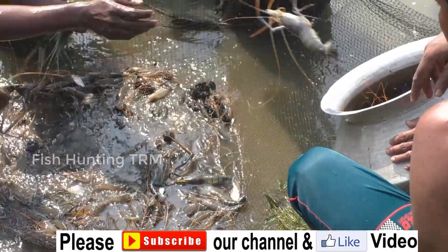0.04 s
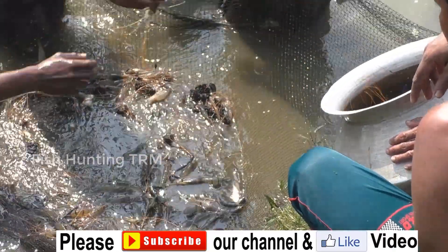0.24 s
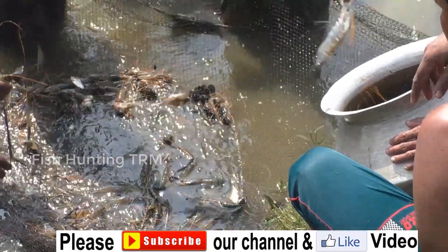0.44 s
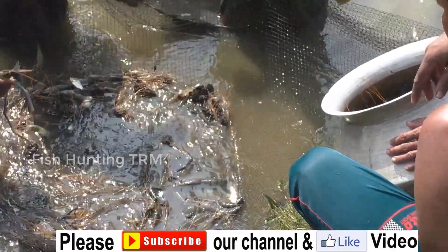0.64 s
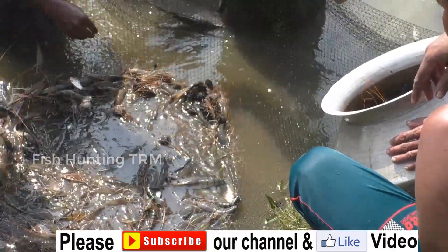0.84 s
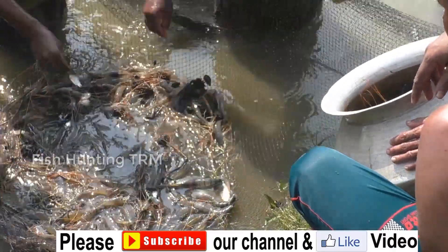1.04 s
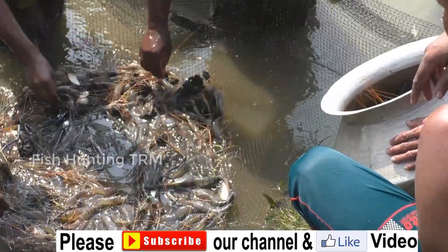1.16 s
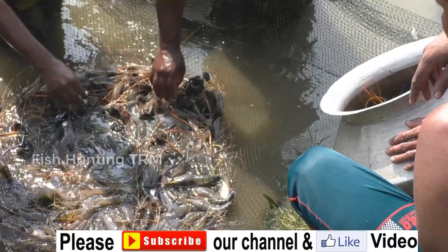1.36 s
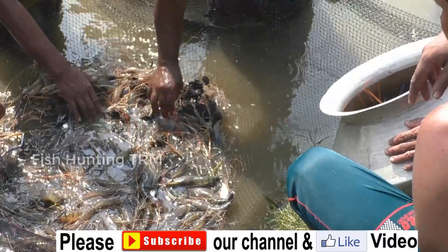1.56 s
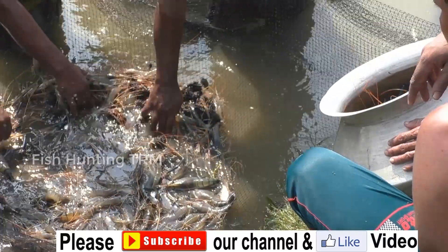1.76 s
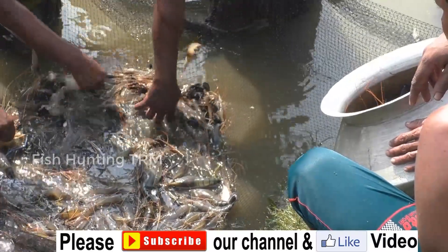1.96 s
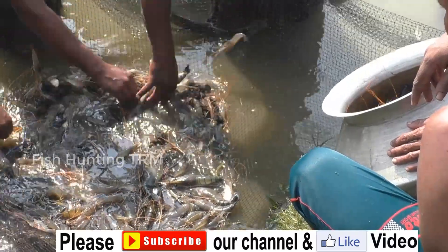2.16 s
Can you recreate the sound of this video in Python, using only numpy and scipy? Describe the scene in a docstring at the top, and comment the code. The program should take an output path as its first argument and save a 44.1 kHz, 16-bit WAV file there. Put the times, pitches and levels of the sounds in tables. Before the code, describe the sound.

Prawns and small fish flap and splash in a wet net, heard close in stereo outdoors; a plop, then sharp smacks and a ringing metal pot knock, then sparser flicks over a faint far throb.

```python
"""Prawns and small fish in a wet net in shallow water, heard close by in stereo as hands sort them.
From the start the catch crackles wetly, over open air and a far, pump-like throb ten times a second.
Flaps burst in bubbles and spray, right of centre at first; soft blows boom in a metal pot and large bubbles plop.
From half a second tails smack, shells snap and the pot wall is knocked, ringing on the right.
The action drifts to the centre while a faint far hum passes at 1.4 s; short dull echoes follow all near sounds."""
import sys
import numpy as np
from scipy import signal
from scipy.fft import rfft, irfft
from scipy.io import wavfile

SR = 44100
rng = np.random.default_rng(int(sys.argv[2]) if len(sys.argv) > 2 else 0)


def store_pcm(level_fs):
    """Save levels as 16-bit WAV."""
    pcm = np.round(np.clip(level_fs, -1, 1) * 32767).astype(np.int16)
    wavfile.write(sys.argv[1], SR, np.atleast_2d(pcm).T)


N = 97020  # 2.2 s

# Place of the action on the water, drifting from right to centre: t/s, left-right level/dB
WATER_PAN = [(.7, -2), (2.0, 0.0423)]
POT_PAN_DB = -2  # left-right level, so a little to the right
DROP_SPREAD_DB = 3.5  # unevenness of the clicks behind bubbles and spray
EDGE_HZ = 16100  # upper limit of the recorder and of the droplet pitches


def amp(db):
    """Decibels to an amplitude factor."""
    return 10 ** (np.asarray(db) / 20)


def evened(x):
    """Scales to rms 1."""
    return x / np.sqrt(np.mean(x ** 2) + 1e-20)


def add(mix, s, sound):
    """Mixes a stereo sound in at time s."""
    part = mix[:, max(0, round(s * SR)):][:, :sound.shape[1]]
    part += sound[:, :part.shape[1]]


def placed(x, pan_db):
    """Mono to stereo by a left-right level difference."""
    return x * amp([[pan_db / 2], [-pan_db / 2]])


def water_pan(s):
    """Left-right level (dB) of the action at time s."""
    return np.interp(s, *np.transpose(WATER_PAN))


def band(x, edges_hz):
    """Causal Butterworth band-pass."""
    sos = signal.butter(N=3, Wn=edges_hz, btype="band", fs=SR, output="sos")
    return signal.sosfilt(sos, x)


def coloured(x, points):
    """Filters x by a response drawn through (Hz, dB) points on a log frequency axis."""
    hz, db = np.transpose(points)
    f = np.fft.rfftfreq(x.shape[-1], 1 / SR)
    gain = amp(np.interp(np.log(f + 1), np.log(hz), db))
    return irfft(rfft(x) * gain, x.shape[-1])


def drops(size, per_s, spread_db):
    """Random clicks of uneven strength and either sign."""
    strength = amp(spread_db * np.minimum(rng.exponential(1, size), 4))
    falls = rng.random(size) < per_s / SR
    return strength * rng.choice([-1, 1], size) * falls


def droplets(size, per_s, spread_db, count=32):
    """Tiny bursting droplets: very short pings at pitches spread evenly over the whole band."""
    width_hz = 609.5  # wide resonance, so each ping dies at once
    radius = np.exp(-np.pi * width_hz / SR)
    out = np.zeros(size)
    for hz in (np.arange(count) + rng.random(count)) * EDGE_HZ / count:
        pole = radius * np.exp(2j * np.pi * hz / SR)
        out += signal.lfilter([1], [1, -pole], drops(size, per_s / count, spread_db)).real
    return out


def ring(modes, t):
    """Sum of dying sines, one for each (Hz, dB, t60 s) mode."""
    return sum(amp(db - 60 * t / t60) * np.sin(2 * np.pi * hz * t) for hz, db, t60 in modes)


def stir():
    """Legs, shells and drips crackle all over the net: dense droplets under a moving level."""
    # Stirring of the wet catch: t/s, level/dB
    stir_level = [(0, -57), (.17, -62.5), (.27, -55), (.47, -56), (.55, -63), (.77, -70), (0.829, -56),
                  (.93, -59), (1.13, -65), (1.17, -55), (1.32, -63.5), (1.56, -65), (1.92, -58.5),
                  (2.03, -52.5), (2.2, -57.5)]
    # Tone of the crackle: f/Hz, level/dB
    stir_tone = [(550, -15.5), (1200, 0.5), (2600, 0), (4500, -9), (10000, -10.5), (16000, -16)]
    per_s, spread_db, width = 12000, 3.5, 0.14785
    centre, wide = (evened(coloured(droplets(N, per_s, spread_db), stir_tone)) for _ in range(2))
    level = amp(np.interp(np.arange(N) / SR, *np.transpose(stir_level)))
    return level * (centre + width * np.array([wide, -wide]))


def distance():
    """Open air as coloured noise, a far throb of regularly pulsed low rumble and a faint passing hum."""
    # Tone of the open air: f/Hz, level/dB
    air_tone = [(20, -26), (80, -1.5), (115, -7), (190, 0), (520, -15.5), (750, -13.5), (1500, -20.5),
                (16000, -46)]
    air_db, air_width = -62, 0.761
    first_s, every_s, length_s = 0.07504, 0.1003, 0.019714  # throb timing
    throb_hz, throb_db = (68.101, 103.65), -61
    hum_hz, hum_db, hum_s, hum_length_s = 704.8, -70, 1.4009, 0.21
    t = np.arange(N) / SR

    mid, side = (evened(coloured(rng.standard_normal(N), air_tone)) for _ in range(2))
    air = amp(air_db) * (mid + air_width * np.array([side, -side]))

    off_beat = (t - first_s + every_s / 2) % every_s - every_s / 2  # seconds from the nearest beat
    # only the phase of the noise is kept, so the rumble wanders in pitch but not in level
    rumble = np.cos(np.angle(signal.hilbert(band(rng.standard_normal(N), throb_hz))))
    throb = amp(throb_db) * evened(rumble) * np.exp(-(off_beat / length_s) ** 2 / 2)

    swell = np.exp(-((t - hum_s) / hum_length_s) ** 2)
    hum = amp(hum_db) * swell * np.sin(2 * np.pi * hum_hz * t)
    return air + throb + hum


def bubbling(t, range_hz, count=20):
    """A swarm of small bubbles, dying sines of rising pitch, within a noise wash of the same range."""
    per_s, cycles, rise = 900, 13.051, 0.012145  # cycles to fall to 1/e; upward glide
    swarm_share = 0.68194  # of the power
    low, high = range_hz
    swarm, u = np.zeros(len(t)), t[:1024]
    for hz in low * (high / low) ** ((np.arange(count) + rng.random(count)) / count):
        age = u * hz / cycles
        bubble = np.exp(-age) * np.sin(2 * np.pi * hz * u * (1 + rise * age))
        births = drops(2 * len(t), per_s / count, DROP_SPREAD_DB)
        swarm += signal.fftconvolve(births, bubble)[len(t):2 * len(t)]  # already under way at t = 0
    wash = evened(band(rng.standard_normal(len(t)), range_hz))
    return np.sqrt(swarm_share) * evened(band(swarm, range_hz)) + np.sqrt(1 - swarm_share) * wash


def flap(s, rise, fall, gurgle_db, splash_db, spray_db):
    """One flap: a dull push of water, low and high bubbles and spray swell together; spray dies fastest."""
    # Tone of the spray before each flap's own variation: f/Hz, level/dB
    spray_tone = [(1500, -29), (3000, -7.5), (3900, 0.5), (5000, -4), (6800, -0.5), (8000, -5.5),
                  (10000, -1.5), (16000, -13.5)]
    gurgle_hz, splash_hz = (1148.5, 2106), (2046.7, 3704.1)  # bubble pitch ranges
    slap_db, slap_hz = -18, (298.9, 992)  # level relative to the gurgle
    drops_per_s, colour_db, spray_fall_share = 16000, 2.0057, 0.86396
    t = np.arange(SR // 4) / SR

    def burst(x, db, fall):
        """Straight rise, then a fall of 20 dB in the given time."""
        shape = np.minimum(t / rise, 1) * amp(-20 * np.maximum(t - rise, 0) / fall)
        return amp(db) * evened(x * shape) * np.sqrt(np.mean(shape ** 2))

    water = burst(bubbling(t, gurgle_hz), gurgle_db, fall)
    water += burst(bubbling(t, splash_hz), splash_db, fall)
    water += burst(band(rng.standard_normal(len(t)), slap_hz), gurgle_db + slap_db, fall)
    colour = [(hz, db + colour_db * rng.standard_normal()) for hz, db in spray_tone]
    mist = coloured(droplets(len(t), drops_per_s, DROP_SPREAD_DB), colour)
    spray = burst(mist, spray_db, fall * spray_fall_share)
    return placed(water, water_pan(s)) + spray  # spray stays central


def pot(splashes):
    """Soft blows boom the air in the pot; knocks ring its wall, which also answers the splashes."""
    # Soft blows: t/s, level/dB
    thumps = [(0.0, -41), (.05, -49), (.31, -49.5), (.365, -35), (.562, -43), (.63, -44), (.641, -45),
              (.682, -45.5), (.906, -44), (1.012, -50), (1.012, -51.5), (1.26, -41.5)]
    # Resonances of the air in the pot: f/Hz, level/dB, t60/s
    hollow = [(204.16, -0.5, 0.1558), (271.16, -2, 0.07042), (334.88, -6, 0.03866)]
    # Resonances of the metal wall: f/Hz, level/dB, t60/s
    wall_modes = [(1096, -6, 0.18428), (1341.5, -3.5, 0.0827), (2059.3, 0, 0.08058), (3171.2, -9, 0.05873)]
    # Knocks on the wall, one hard and one glancing: t/s, level/dB
    knocks = [(.7225, -22), (1.055, -46)]
    thump_rise_s, knock_rise_s, sympathy_db = 0.0020745, 0.003074, -9
    out, t = np.zeros((2, N)), np.arange(SR // 2) / SR

    boom = np.minimum(t / thump_rise_s, 1) * ring(hollow, t)
    for s, db in thumps:
        add(out, s, placed(amp(db) * boom, 0))
    wall = ring(wall_modes, t) * (1 - np.exp(-(t / knock_rise_s) ** 2))
    for s, db in knocks:
        add(out, s, placed(amp(db) * wall, POT_PAN_DB))
    response = wall / abs(rfft(wall)).max()  # gain 1 at the strongest resonance
    return out + amp(sympathy_db) * signal.fftconvolve(splashes, response[None], axes=1)[:, :N]


def echoes(x):
    """Short dull reflections from water, bank and bodies: decaying noise, different at each ear."""
    level_db, t60_s, delay_s = -12, 0.07412, 0.002
    t = np.arange(SR // 4) / SR
    tail = rng.standard_normal((2, len(t))) * np.exp(-np.log(1000) * t / t60_s) * (t > delay_s)
    tone = [(250, 4.5), (1000, -1.5), (3000, 0.5), (14000, -14.5)]  # f/Hz, level/dB
    tail = coloured(tail / np.linalg.norm(tail[0]), tone)
    return amp(level_db) * signal.fftconvolve(x, tail, axes=1)[:, :N]


def plops():
    """Large bubbles, as under a tossed prawn, ring briefly and rise a little in pitch."""
    # Large single bubbles: t/s, f/Hz at the start, level/dB ahead of the soft onset, t60/s
    large_bubbles = [(0.2074, 1155, -10, 0.034985), (0.2102, 1362, -21.5, 0.09078),
                     (.295, 1900, -28, 0.08498), (.299, 1286, -29, 0.04606), (.396, 1662, -33, 0.073),
                     (.567, 3488, -27.5, 0.0512), (.584, 1456, -28.5, 0.06058), (1.261, 3017, -33, 0.05394),
                     (1.262, 3298, -33.5, 0.04297), (2.086, 2457, -41.5, 0.0353)]
    rise_s, glide = 0.0006587, 0.01829
    out, t = np.zeros((2, N)), np.arange(SR // 4) / SR
    for s, hz, db, t60 in large_bubbles:
        tone = np.sin(2 * np.pi * hz * t * (1 + glide * t / t60))
        shape = np.exp(-np.log(1000) * t / t60) * (1 - np.exp(-t / rise_s))
        add(out, s, placed(amp(db) * shape * tone, POT_PAN_DB))
    return out


def smacks():
    """A tail hits the water and traps a pocket of air that rings for a few cycles; hard shells snap."""
    # Tail smacks on the water: t/s, f/Hz, envelope peak level/dB
    tail_hits = [(0.5626, 1770, -19), (0.5626, 2650, -18.5), (1.6463, 2848, -30.5), (1.9873, 2238, -27)]
    # Shell snaps: t/s, envelope peak level/dB
    shell_snaps = [(0.7243, -16.5), (1.994, -18)]
    smack_peak_s, snap_hz, snap_peak_s = 0.0012111, 4894, 0.00006  # time from onset to peak
    out, t = np.zeros((2, N)), np.arange(SR // 20) / SR

    def pulse(s, hz, db, peak_s):
        """A sine under a quick swell and decay."""
        shape = t / peak_s * np.exp(1 - t / peak_s)
        add(out, s, placed(amp(db) * shape * np.sin(2 * np.pi * hz * t), water_pan(s)))

    for s, hz, db in tail_hits:
        pulse(s, hz, db, smack_peak_s)
    for s, db in shell_snaps:
        pulse(s, snap_hz, db, snap_peak_s)
    return out


def scene():
    """The near sounds with their echoes, over the distance."""
    # Flaps and splashes: t/s, rise/s, time to fall 20 dB/s, gurgle level/dB, splash level/dB, spray level/dB
    flaps = [(0.0,0.00309,0.1634,-56.5,-49,-49), (.038,0.02291,0.0468,-45.5,-46,-52),
             (.119,0.00186,0.1632,-66,-60.5,-52), (.2075,0.001141,0.0213,-25.5,-34.5,-35.5),
             (.227,0.001384,0.0598,-37,-39,-46.5), (0.2934,0.004514,0.032,-36,-36.5,-45),
             (.312,0.01443,0.074,-45.5,-47,-45.5), (.361,0.01056,0.0295,-45,-37,-41),
             (.389,0.00726,0.0596,-41,-45.5,-48.5), (.436,.004,.016,-55,-43,-40),
             (.562,0.0019016,0.0229,-27,-25.5,-24), (.573,0.00319,.034,-34,-32.5,-44),
             (.628,0.005466,0.0988,-41.5,-40.5,-42.5), (.668,0.015538,0.0704,-41.5,-38.5,-39.5),
             (.7228,0.000948,0.0098,-32.5,-25,-26.5), (.858,0.004465,.07,-49,-46,-47),
             (.906,0.002864,0.0165,-56,-47.5,-53), (.959,.009,0.009,-54,-48,-41),
             (1.008,0.028096,0.0823,-55.5,-46.5,-48.5), (1.205,0.025054,0.0661,-56,-51,-47.5),
             (1.26,0.002566,0.0291,-50,-39,-42), (1.371,0.001117,0.0275,-60,-56,-42.5),
             (1.38,0.002857,0.0167,-55,-49,-42.5), (1.392,0.01017,0.0354,-57.5,-56,-58.5),
             (1.508,0.008395,0.0102,-65,-54,-61.5), (1.574,.003,.06,-54,-45,-50),
             (1.597,0.01017,0.0284,-53.5,-49.5,-44.5), (1.6433,.0035,.03,-42,-38,-46),
             (1.718,0.002033,0.063,-63,-59.5,-50), (1.9452,0.001251,.011,-54,-53,-35),
             (1.956,0.0039,.05,-52,-45,-44), (1.9825,0.004676,0.0213,-46,-40.5,-38),
             (1.993,0.000853,0.021,-38.5,-36,-34)]
    splashes = stir() + smacks()
    for row in flaps:
        add(splashes, row[0], flap(*row))
    near = splashes + plops() + pot(splashes)
    return near + echoes(near) + distance()


def record(dry):
    """The recorder's band limit: a linear-phase low-pass."""
    lowpass = signal.firwin(301, EDGE_HZ, window=("kaiser", 9), fs=SR)
    return signal.oaconvolve(dry, lowpass[None], "same")


dry = scene()
out = record(dry)
store_pcm(out)
```